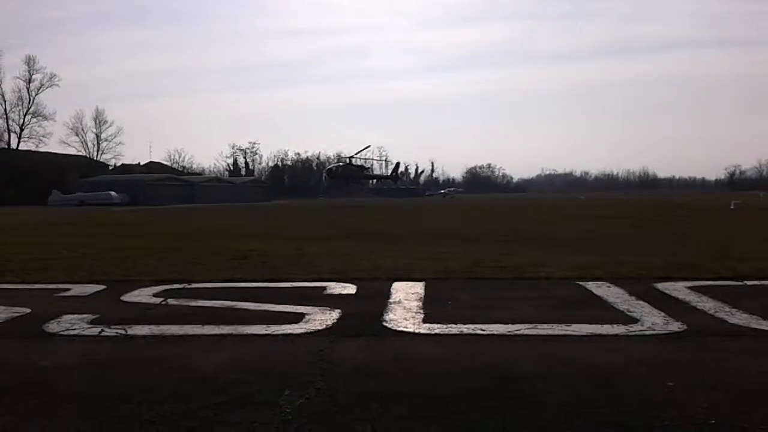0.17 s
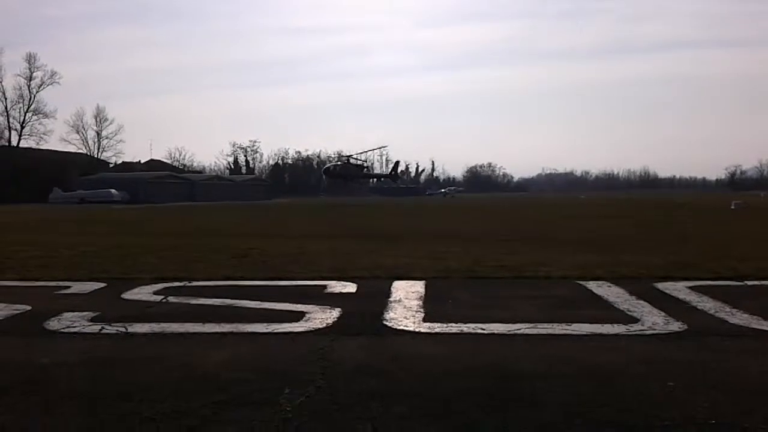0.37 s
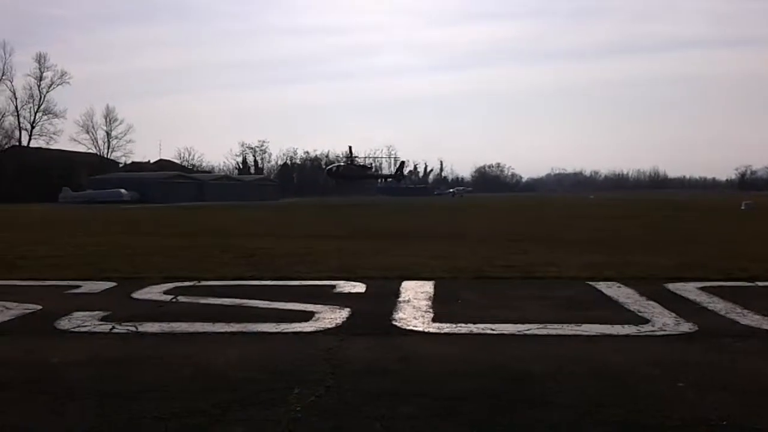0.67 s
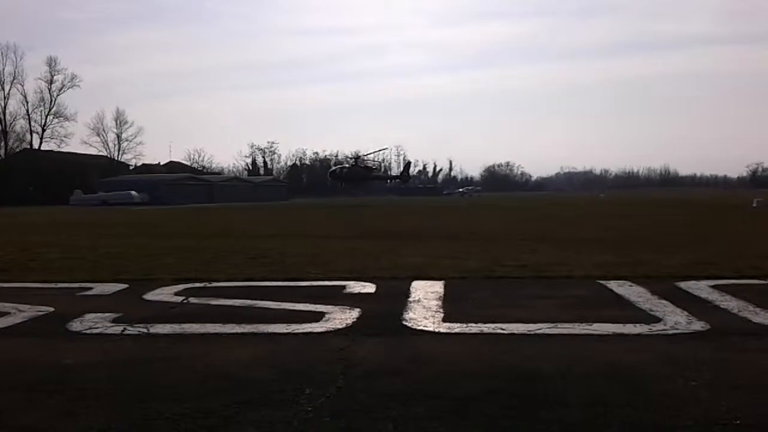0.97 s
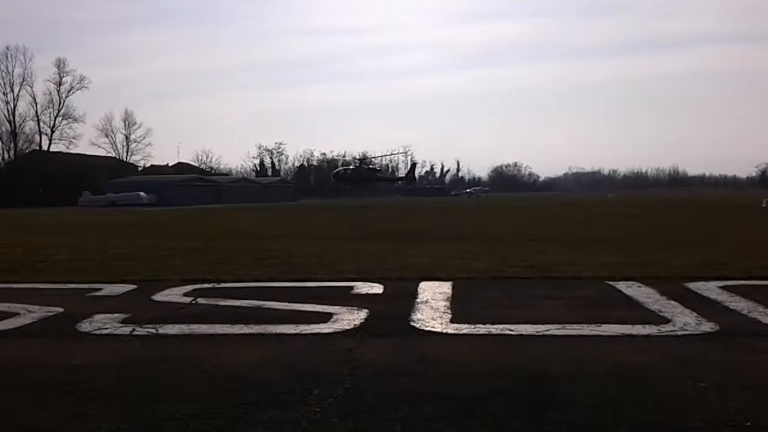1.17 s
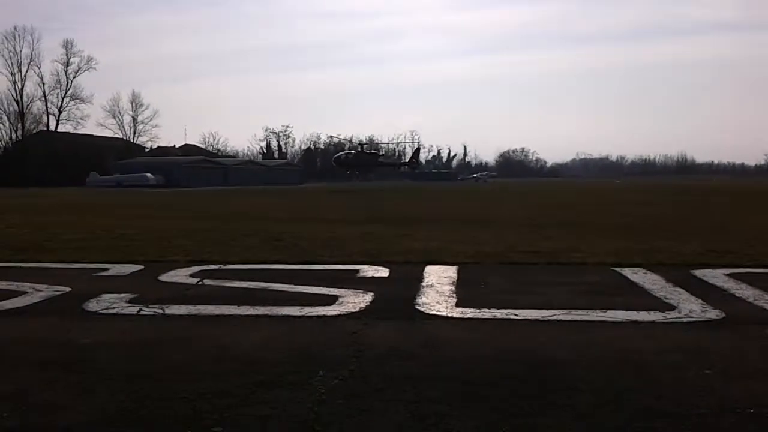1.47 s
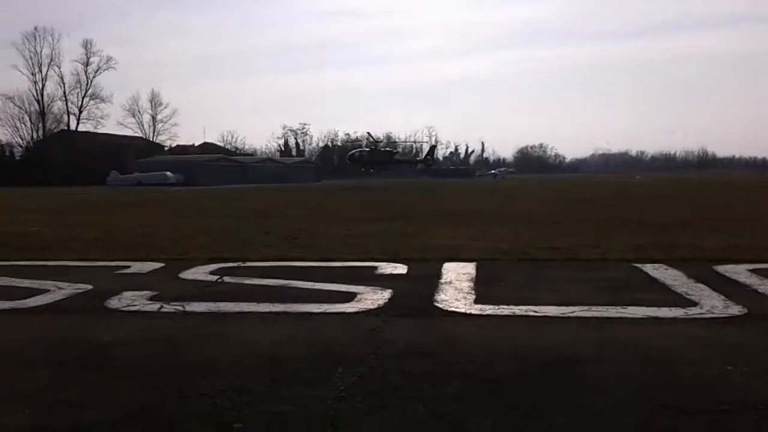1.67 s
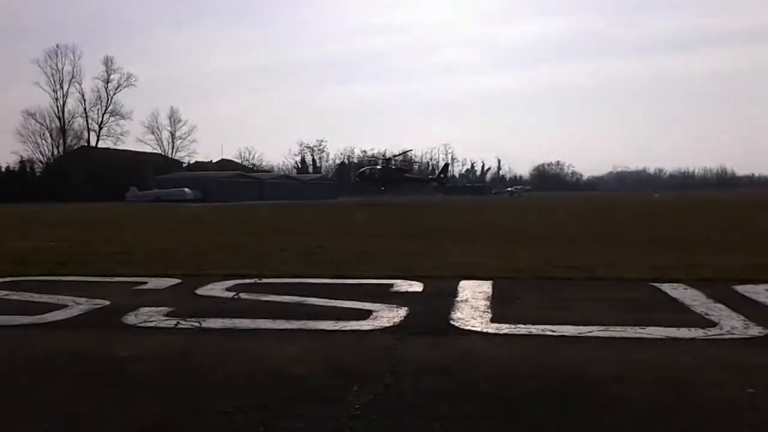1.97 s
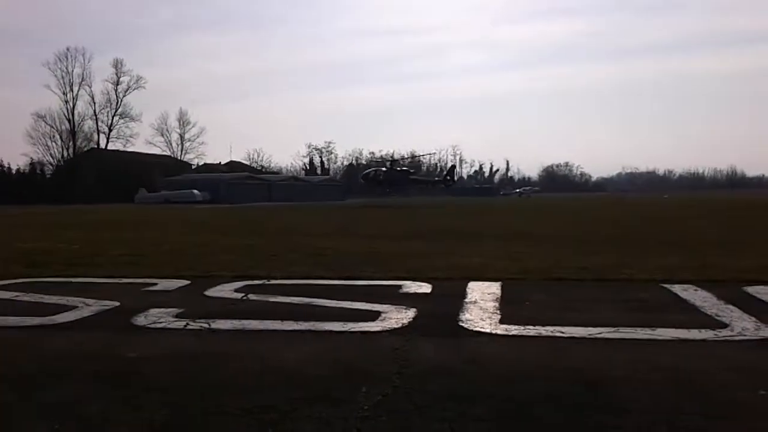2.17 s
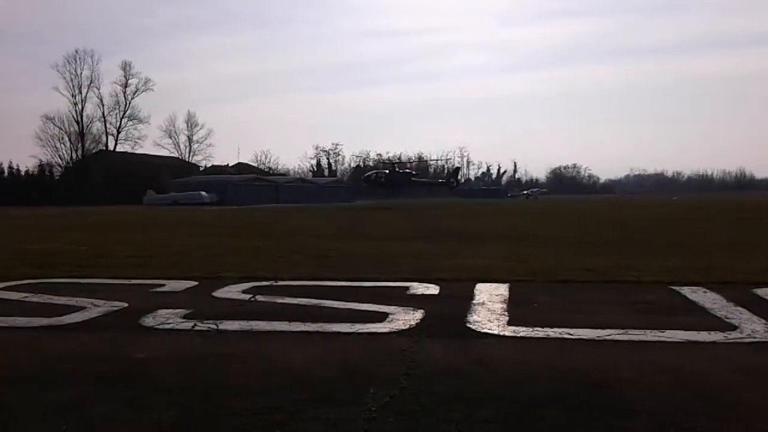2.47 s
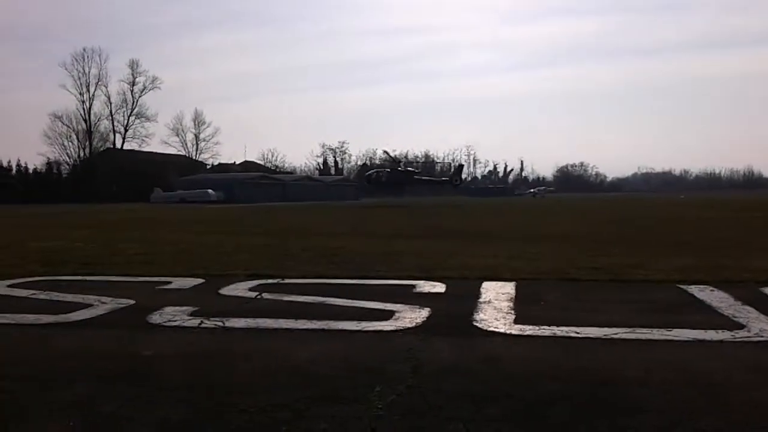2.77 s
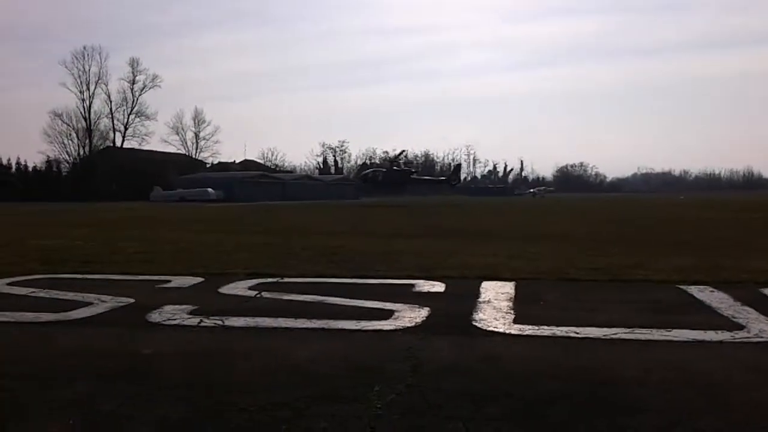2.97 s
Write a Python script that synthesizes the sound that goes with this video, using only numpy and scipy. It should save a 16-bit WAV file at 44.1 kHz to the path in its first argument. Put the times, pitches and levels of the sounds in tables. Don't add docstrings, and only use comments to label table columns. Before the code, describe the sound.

Distant hovering helicopter with a shrill wavering turbine whistle, fast chopping blade slaps and steady exhaust roar

```python
import sys
import numpy as np
from scipy import signal
from scipy.fft import rfft, irfft
from scipy.io import wavfile
from scipy.ndimage import uniform_filter1d

SR = 44100
rng = np.random.default_rng(int(sys.argv[2]) if len(sys.argv) > 2 else 0)


def amplitude_ratio(level_db):
    exponent = np.asarray(level_db, float) / 20
    return 10 ** exponent


def output_pcm(signal):
    pcm = np.clip(np.atleast_2d(signal).T, -1, 1) * 32767
    wavfile.write(sys.argv[1], SR, np.round(pcm).astype(np.int16))


N = 137151
BLADE_HZ = 19.4


def curve(table, t):
    rows = np.array(table, float).T
    return [np.interp(t, rows[0], column) for column in rows[1:]]


def walk(rate):
    hold = int(SR / rate)
    steps = np.repeat(rng.standard_normal(N // hold + 1), hold)
    return 1.81 * uniform_filter1d(uniform_filter1d(steps, hold), hold)[:N]


def drift(gain):
    white = [1, 1j] @ rng.standard_normal((2, N))
    noise = np.fft.ifft(gain(np.fft.fftfreq(N, 1 / SR)) * white)
    return noise / np.sqrt(np.mean(np.abs(noise) ** 2))


def faded(turns, fade_hz):
    steady_db = -2
    scattered = drift(lambda f: np.exp(-.5 * (f / fade_hz) ** 2))
    paths = amplitude_ratio(steady_db) + scattered
    return np.exp(2j * np.pi * turns) * paths * np.sqrt(2 / (1 + amplitude_ratio(2 * steady_db)))


def beat(t, lag_ms):
    return ((t - lag_ms / 1000) * BLADE_HZ + .5) % 1 / BLADE_HZ - .5 / BLADE_HZ


# time in seconds, level in dB, blade flash in dB relative to the whistle.
WHISTLE = [(0, -8, -18), (.08, -14.5, -6.5), (.3, -10.5, -10.5), (.48, -15.5, 3.5), (.65, -11.5, -8),
           (.8, -16.5, -0.5), (1, -12.5, -1.5), (1.2, -16, -2.5), (1.35, -12.5, -13), (1.6, -11.5, -8.5),
           (1.95, -16, -2.5), (2.15, -12, -5), (2.3, -18.5, 2), (2.5, -12.5, -7.5), (2.75, -14, -2),
           (3, -18, 1.5), (3.11, -21, 0.5)]
# offset from its pitch in Hz, dB per Hz.
WHISTLE_BLUR = [(-500, -34), (-130, -17.5), (-46, -21), (0, -22), (48, -12.5), (144, -13.5), (496, -30.5),
                (1083.5, -43)]
FADE_HZ = 28


def whistle(t):
    start_hz, sag_hz_per_s, wander_hz = 7864, 7, 7
    level_db, flash_db = curve(WHISTLE, t)
    turns = start_hz * t - sag_hz_per_s * t ** 2 / 2 + np.cumsum(wander_hz * walk(30.35)) / SR

    blur_table = [(-3000, -120)] + WHISTLE_BLUR + [(3000, -120)]
    blur = amplitude_ratio(-9.5 + 2 * walk(20)) * drift(lambda f: amplitude_ratio(curve(blur_table, f)[0]))

    flash_lag_ms, flash_ms = 37, 5.4
    flash_from_hz, flash_reach_hz = 7950, 260
    from_blade_ms = beat(t, flash_lag_ms + 2 * walk(5.84)) * 1000
    gate = np.exp(-.5 * (from_blade_ms / flash_ms) ** 2) * amplitude_ratio(flash_db + 1.2 * walk(15))
    flash = gate * drift(lambda f: (f > flash_from_hz) * np.exp(-np.abs(f - flash_from_hz) / flash_reach_hz))

    tone = faded(turns, FADE_HZ) + blur * np.exp(2j * np.pi * turns)
    return amplitude_ratio(level_db) * (tone + flash), turns


SHAFT_MULTIPLES = [4, 5, 7, 8, 9, 10, 12, 13, 14, 15, 16, 17, 22]
SHAFT_DB = [-47.5, -53, -45, -57.5, -55, -44, -54, -49.5, -50.5, -64, -64, -76.5, -47.5]


def shaft_tones(turns):
    compressor_blades = 11
    out = 0
    for multiple, level_db in zip(SHAFT_MULTIPLES, SHAFT_DB):
        share = multiple / compressor_blades
        waver_db = 2.5 if share == 2 else 3
        out = out + amplitude_ratio(level_db + waver_db * walk(8.85)) * faded(turns * share, FADE_HZ * share)
    return out


# pitch in Hz, level in dB.
GEAR_TONES = [
    (1281, -48),
    (1669, -56),
    (2562, -53),
    (3844, -48),
]


def gears(t):
    out = 0
    for gear_hz, level_db in GEAR_TONES:
        out = out + amplitude_ratio(level_db + 2.6 * walk(3.55)) * faded(gear_hz * t, 14)
    return out


def turbine(t):
    main, turns = whistle(t)
    return (main + shaft_tones(turns) + gears(t)).real


def crack_noise(s):
    crack_ms, snap_ms, snap_db = .3, 1.6, -3.5
    burst_band = signal.butter(3, [900, 5300], "band", fs=SR, output="sos")
    snap_band = signal.butter(4, [1350, 5060], "band", fs=SR, output="sos")
    rough = 1 + 0.45 * rng.standard_normal(s.shape)
    burst = (s > 0) * np.exp(-np.abs(s) * 1000 / crack_ms) * rough
    snap = (s > 0) * np.exp(-np.abs(s) * 1000 / snap_ms) * rng.standard_normal(s.shape)
    return signal.sosfilt(burst_band, burst) + amplitude_ratio(snap_db) * signal.sosfilt(snap_band, snap)


def slaps(table):
    start = np.arange(int(N / SR * BLADE_HZ) + 1) / BLADE_HZ
    lag_ms, ring_db, body_db, crack_db = (column[:, None] for column in curve(table, start))
    chance = rng.standard_normal((len(start), 8)).T[:, :, None]
    late, ring_pitch, ring_level, crack_level, thump_pitch, thump_level, body_pitch, body_level = chance
    at = start[:, None] + (lag_ms + .4 * late) / 1000
    index = (at * SR).astype(int) + np.arange(-800, 1200)
    s = index / SR - at

    ring_hz, rise_cycles, fall_cycles, glide = 605, .8, 2, .08
    u = s * ring_hz * (1 + .04 * ring_pitch)
    ring_shape = np.exp(-.5 * (u / np.where(u < 0, rise_cycles, fall_cycles)) ** 2)
    falling = u * (1 - glide * np.tanh(u / 4))
    ring = ring_shape * np.sin(2 * np.pi * falling + crack_level / 4)

    body_hz, body_cycles, body_late_ms = 313, 0.59, 2.07
    w = (s - body_late_ms / 1000) * body_hz * np.exp(0.16 * body_pitch)
    body = np.exp(-.5 * (w / body_cycles) ** 2) * np.sin(2 * np.pi * w)

    thump_hz, thump_db, thump_late_ms = 171, -7, 4.28
    v = (s - thump_late_ms / 1000) * thump_hz * (1 + 0.076 * thump_pitch)
    thump = amplitude_ratio(thump_db + 1.6 * thump_level) * np.exp(-.5 * (v / 0.5) ** 2) * np.sin(2 * np.pi * v)

    wave = amplitude_ratio(ring_db + 1.5 * ring_level) * ring
    wave = wave + amplitude_ratio(body_db + 1.5 * body_level) * (body + thump)
    wave = wave + 2 * amplitude_ratio(crack_db + 1.2 * crack_level) * crack_noise(s)
    return np.bincount(np.clip(index, 0, N).ravel(), wave.ravel(), N + 1)[:N]


# time in seconds,
# lag after the blade passage in ms, ring level in dB, body level in dB, crack level in dB.
FIRST_VORTEX = [(0, 12.8, -27, -37, -22), (.065, 13, -22, -33, -7.5), (.12, 14, -29, -22, -26.5),
                (.22, 13.5, -46, -38, -11), (.4, 13.7, -33, -26, -35), (.55, 13.4, -24.5, -25, -18),
                (.75, 14.17, -27, -18.5, -29), (.93, 13, -24.5, -24, -20.5), (1.1, 9.1, -19, -30.5, -30),
                (1.3, 9, -23, -36, -17.5), (1.4, 13, -40, -45, -34)]
SECOND_VORTEX = [(0, 22, -26.5, -30.5, -45), (.5, 21, -36.5, -34, -19), (.87, 24, -29, -19.5, -21.5),
                 (1.05, 23, -27.5, -31.5, -18), (1.35, 18.2, -25.5, -22, -25.5), (1.55, 20, -39, -23, -24),
                 (1.85, 20, -34.5, -22.5, -27), (2.08, 17, -21.5, -22, -17), (2.25, 18, -27, -20, -17),
                 (2.33, 16.5, -27, -27, -13), (2.4, 15, -26.5, -28.5, -19), (2.6, 18.1, -29.5, -22, -35),
                 (3.11, 18, -24.5, -20.5, -37)]
THIRD_VORTEX = [
    (0, 31.95, -43, -34, -34),
    (1.8, 29.98, -52, -36.5, -32),
    (2.1, 25.67, -31, -30, -37),
    (2.45, 29.22, -33, -29, -20),
    (2.75, 29.28, -25.5, -31, -20),
    (3.11, 25.84, -31, -27, -39),
]


def blade_slaps():
    return slaps(FIRST_VORTEX) + slaps(SECOND_VORTEX) + slaps(THIRD_VORTEX)


# frequency in Hz, dB per Hz.
ROAR_LOW = [(25, -29.5), (60, -11.5), (170, 2.5), (400, -2), (680, -8.5), (900, -6.5), (1150, -12),
            (2100, -9.5)]
ROAR_HIGH = [(2100, -13), (2600, -6), (3250, -7), (3850, 2.5), (5100, -5.5), (6000, -19), (7000, -10),
             (9500, -16)]
ROAR_HISS = [(9500, -22), (11000, -33), (11900, -47.5), (13000, -29), (14500, -24), (16000, -26.5)]
# time in seconds, level in dB.
EXHAUST_AIM = [(0, -31.5), (.07, -28.5), (.2, -30), (.45, -29.5), (.78, -27), (.95, -30), (1.28, -31.5),
               (1.5, -33), (1.8, -32), (1.95, -27), (2.2, -31.5), (2.5, -32), (2.7, -30), (2.9, -28.5),
               (3.11, -25.5)]
# time in seconds, level in dB.
TOP_HISS = [
    (0, 2.5),
    (1.8, 3.5),
    (2.5, -3.5),
    (2.7, 2),
    (2.85, 8),
    (3.11, 12),
]


def roar(t):
    f = np.fft.rfftfreq(N, 1 / SR) + 1
    colour = np.array(ROAR_LOW + ROAR_HIGH[1:] + ROAR_HISS[1:])
    colour_db = np.interp(np.log(f), np.log(colour[:, 0]), colour[:, 1])
    noise = rfft(rng.standard_normal(N)) * amplitude_ratio(colour_db)
    noise = noise / np.std(irfft(noise, N))

    aim_db = curve(EXHAUST_AIM, t)[0] + 29.5
    swell_db = .5 * walk(3.63)
    chop_lag_ms = 19.4
    chop_db = 1.5 * np.cos(2 * np.pi * BLADE_HZ * (t - chop_lag_ms / 1000))
    hiss_db = curve(TOP_HISS, t)[0]
    out = 0
    for k in np.arange(13, 43):
        band = irfft(noise * np.clip(1 - np.abs(3 * np.log2(f) - k), 0, 1), N)
        follow = np.interp(k / 3, np.log2([400, 3500, 14000]), [1, 1, 0])
        extra_db = chop_db if k < 38 else hiss_db * (k > 40)
        level_db = follow * aim_db + swell_db + 1.2 * walk(14) + extra_db
        out = out + amplitude_ratio(level_db) * band
    return amplitude_ratio(-27.5) * out


LIFT_DB = [
    -52,
    -60.5,
    -58.5,
    -57,
    -50,
]


def rotor_lift(t):
    out = 0
    for k, level_db in enumerate(LIFT_DB):
        out = out + amplitude_ratio(level_db) * np.sin(2 * np.pi * (k + 1) * BLADE_HZ * t + k)
    return out


def ground(x):
    late_ms, level_db, low_hz, top_hz = 1.67, -5, 518, 2400
    f = np.fft.rfftfreq(N, 1 / SR) + 1
    share = amplitude_ratio(level_db) / (1 + (low_hz / f) ** 4) / (1 + (f / top_hz) ** 2)
    echo = share * np.exp(-2j * np.pi * f * late_ms / 1000)
    return irfft(rfft(x) * (1 + echo), N)


def scene():
    t = np.arange(N) / SR
    return (turbine(t) + rotor_lift(t) + ground(blade_slaps() + roar(t)))[None]


def roll_off(x):
    return signal.sosfilt(signal.butter(12, 16830, fs=SR, output="sos"), x)


def record(dry):
    drive = .5
    x = np.tanh(drive * dry) / drive
    x = signal.sosfilt(signal.butter(1, 60, "high", fs=SR, output="sos"), x)
    x = signal.sosfilt(signal.ellip(12, .5, 90, 15770, fs=SR, output="sos"), x)
    return roll_off(x)


dry = scene()
out = record(dry)
output_pcm(out)
```